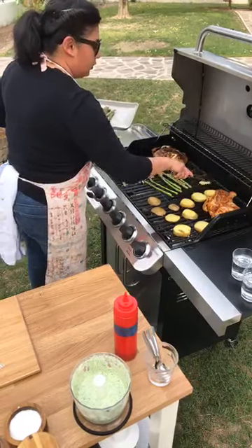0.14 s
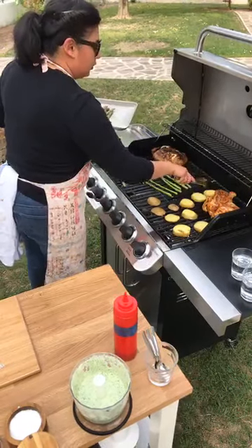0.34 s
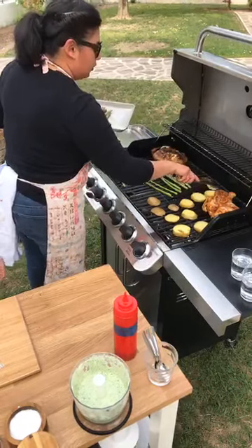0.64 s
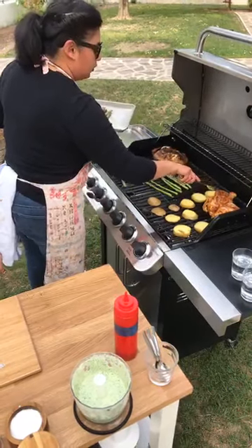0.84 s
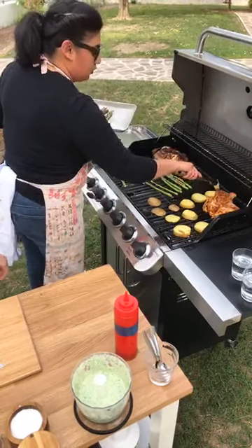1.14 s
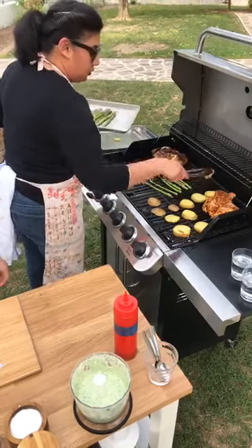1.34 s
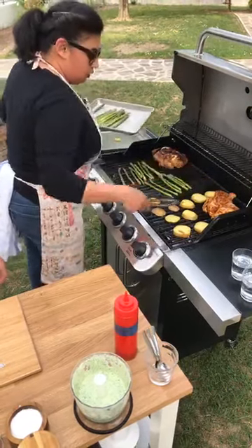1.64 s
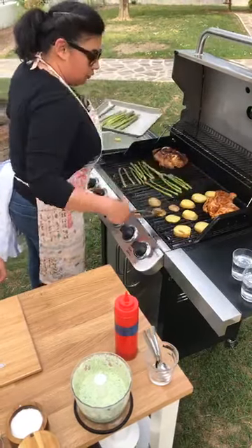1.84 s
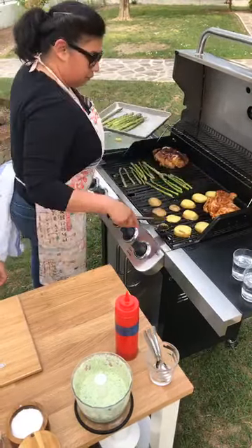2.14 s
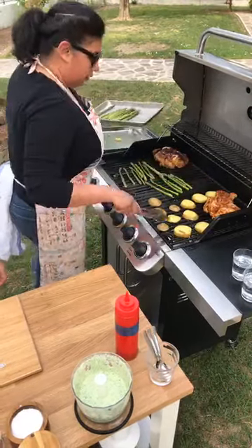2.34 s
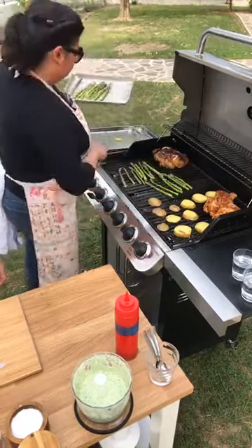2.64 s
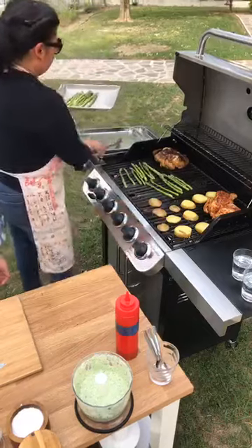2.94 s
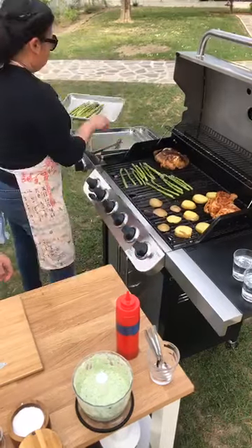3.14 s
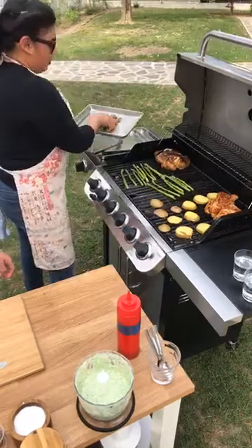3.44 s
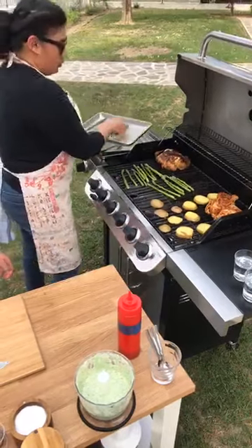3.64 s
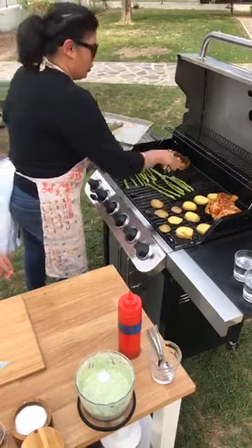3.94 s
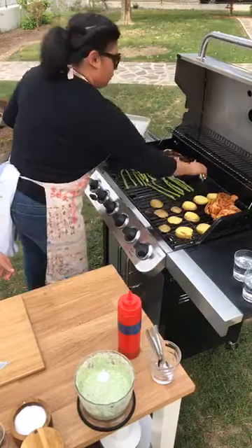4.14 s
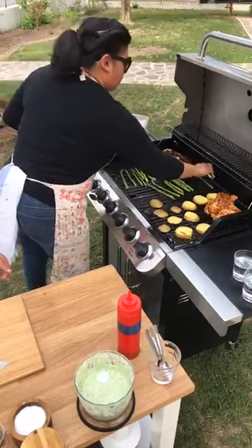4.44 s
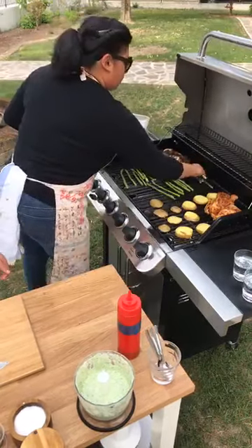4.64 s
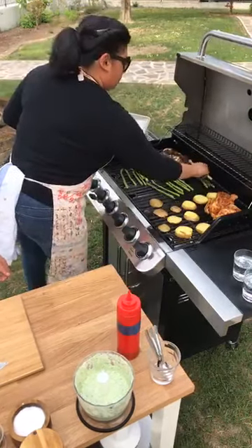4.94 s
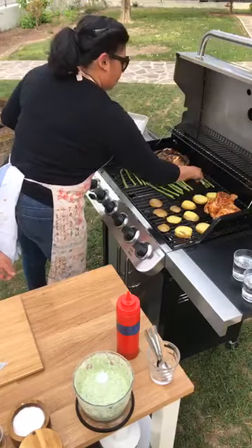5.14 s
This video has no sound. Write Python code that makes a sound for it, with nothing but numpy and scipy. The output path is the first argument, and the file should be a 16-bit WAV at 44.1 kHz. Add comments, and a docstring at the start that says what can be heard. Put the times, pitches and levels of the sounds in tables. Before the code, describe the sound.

Vegetables sizzle softly on a gas grill outdoors, a fine hiss and crackle with small spits of fat. Wind thumps and flutters on the microphone, strongest in the first half, then dies away. Metal tongs tap the grate, strike it once harder, then drop onto a steel tray with a ringing, bouncing clatter. Lighter taps follow over the faint rush of the burner, with a few barely audible distant whistles near the end.

```python
"""Vegetables sizzle on a gas grill outdoors, at one microphone: steam hisses, bubbles burst, fat spits.
Tongs knock the grate, then drop on a steel tray and bounce; the steel rings in many close modes.
Gusts thump and flutter on the microphone and die away. Behind the grill lie the burner and the
open air, and far off a faint whistle, perhaps a bird."""
import sys
import numpy as np
from scipy import signal
from scipy.fft import rfft, irfft
from scipy.io import wavfile
from scipy.ndimage import uniform_filter1d

SR = 44100
rng = np.random.default_rng(int(sys.argv[2]) if len(sys.argv) > 2 else 0)


def int16_out(signal):
    """Quantize to a 16-bit WAV file."""
    q = np.round(np.clip(np.atleast_2d(signal).T, -1, 1) * 32767)
    wavfile.write(sys.argv[1], SR, q.astype(np.int16))


N = 233994

# level of the sizzle as heard, ducking briefly after the tray clatter: t/s, level/dB
SIZZLE_LEVELS = [(0, -55), (.4, -54.5), (.7, -56.5), (1.2, -57), (1.38, -53.5), (2.05, -60), (2.8, -57),
                 (3.25, -60), (3.45, -56), (4.25, -63), (4.6, -60), (5.31, -60)]
# spectrum of the steam: f/Hz, level/dB
STEAM_SPECTRUM = [(880, -12), (1500, -9), (2400, -8), (3000, -8.5), (3750, -5), (4150, -12), (5100, -11.5),
                  (5400, -4), (6400, -2.5), (8500, -5), (10200, -8), (12000, -7), (13500, -11), (15500, -4)]
# drops of fat bursting: t/s, rough peak level/dB
FAT_SPITS = [(0.45, -39), (0.835, -44), (1.078, -39.5), (1.1603, -40.5), (1.282, -40.5), (1.4103, -37),
             (1.444, -44), (1.7883, -37), (2.2029, -43), (2.3573, -41), (2.458, -38.5), (3.4391, -42.5),
             (3.688, -39.5), (3.806, -34.5), (4.0978, -43.5), (4.4325, -39), (4.592, -37), (4.732, -36),
             (4.7517, -38.5), (4.9076, -46.5), (4.9696, -35.5)]
# tongs on the grate: t/s, level/dB, favoured f/Hz, fall-off/(dB per octave), ring time factor
GRATE_KNOCKS = [(.209, -46.5, 600, 7.5, 1.5), (.763, -50, 840, 8, 1.3), (.765, -53, 6340, 31, 0.37),
                (.895, -50.5, 2950, 5.5, 1.64), (.9, -54.5, 547, 13, 1.18), (.93, -53, 3000, 7, 0.84),
                (.962, -61, 1800, 4, 0.83), (.958, -51.5, 6350, 41, .6), (1.991, -50, 4000, 1.5, 0.73),
                (2.228, -31.5, 1770, 3, 1.67), (3.34, -47, 1450, 0, 0.81), (3.474, -54.5, 1320, 2.5, 0.37),
                (3.5, -59, 600, 16, 0.44), (3.898, -60, 2000, 25, 0.1), (4.398, -59, 220, 7, 1.2),
                (4.8, -63, 208, 12.5, 1.6), (5.268, -47.5, 520, 6, 0.95)]
# clear modes of the grate: f/Hz, level/dB, t60/s
GRATE_MODES = [(210, -7, .5), (340, -9, .4), (517, -7, .6), (635, -8, .4), (870, -3, .18), (990, -4, .45),
               (1195, -11, .25), (1443, -11, .3), (1696, -7, .25), (1880, -3, .4), (2606, -10, .22),
               (3250, -10, .22)]
# bands of close modes in the grate: f/Hz, level/dB, t60/s
GRATE_BANDS = [(182, 3, 0.31), (550, 2.5, 0.57), (860, 3.8, 0.5), (2000, 5, 0.31), (3430, 0.5, 0.2),
               (4930, -4.5, 0.29), (5640, 4, 0.27), (12100, -1, 0.24), (16000, -1, .2)]
# the tongs land on the tray, then bounce: t/s
TRAY_HITS = [2.863, 2.924, 2.988, 3.011, 3.109]
# clear modes of the tray: f/Hz, level/dB, t60/s
TRAY_MODES = [(530, -4, 0.22), (623, -5.5, 0.36), (768, -10, 0.16), (972, -5, 0.48), (1025, 2, 0.11),
              (1206, -16, 0.52), (1500, -8, 0.22), (1610, -7.5, 0.36), (1671, -8, 0.35),
              (3300, -11.5, 0.33), (6340, -5.5, 0.21), (7400, -4, 0.2)]
# bands of close modes in the tray: f/Hz, level/dB, t60/s
TRAY_BANDS = [(156, -5, 0.48), (324, -10, 0.84), (600, -8, 0.65), (1010, -0.5, 0.4), (2000, 1, 0.39),
              (4000, -3.5, 0.41), (6600, 3.5, 0.31), (9050, -8, 0.36), (12500, -4.5, 0.32), (16000, -9, .2)]
# wind on the microphone: t/s, thump level/dB, flutter level/dB
WIND_LEVELS = [(0, -58, -35.5), (.2, -37, -31.5), (.5, -45.5, -34), (.7, -42, -30.5), (1.5, -42, -35),
               (2.2, -42.5, -50.5), (3.4, -48, -54), (3.9, -53.5, -59), (4.5, -63, -57), (5.31, -47.5, -61)]
# single buffets: middle t/s, level/dB, half length/s, relative roar level/dB
WIND_BUFFETS = [(0.016, -34, 0.036, -28), (0.197, -43, 0.08, -3), (0.65, -35, 0.072, -21),
                (0.75, -37, .03, -14), (1.067, -30, 0.011, -11), (1.159, -37, 0.048, -0.5),
                (1.219, -33.5, 0.014, -24), (1.674, -32.5, 0.07, -27), (1.843, -38, 0.018, -38),
                (1.942, -31.5, 0.027, -54), (2.13, -33.5, 0.042, -12), (2.243, -37.5, 0.04, -19),
                (2.439, -26.5, 0.031, -14.5), (2.65, -36.5, 0.037, -12), (2.733, -32, 0.011, -42),
                (2.81, -33, 0.012, -35), (2.967, -35, 0.033, -14.5), (3.145, -24, 0.032, -33),
                (3.271, -31, 0.028, -37), (3.372, -33, 0.017, -15), (3.643, -37.5, 0.061, -56)]
# spectra of the wind's roar and thumps: f/Hz, level/dB
ROAR_SPECTRUM = [(70, -3.5), (110, 3), (200, -11), (260, -29.5), (500, -101)]
THUMP_SPECTRUM = [(10, -4), (25, 4.5), (40, 5.5), (55, 8.5), (90, -62)]
# a grate bar humming: t/s, length/s, level/dB
BAR_HUMS = [(3.45, 0.29, -69), (4.39, 0.78, -67)]
# burner and open air: f/Hz, level/dB
AMBIENCE_SPECTRUM = [(50, -29), (90, 0.5), (150, -9), (220, -12.5), (400, -19), (700, -22), (1300, -23),
                     (5000, -36.5), (8000, -93)]
# far whistles: t/s, length/s, first f/Hz, last f/Hz, glide time/s, level/dB
FAR_WHISTLES = [(4.25, .15, 2540, 2090, .15, -73), (4.65, .32, 1940, 2080, .11, -70),
                (5.09, .08, 2320, 2150, .08, -65)]


def sizzle(flicker_db=1.64, crackle_db=-10, bubbles_per_s=400):
    """On the grill, steam hisses with a flickering level and small bubbles burst in a crackle."""
    hiss = amp(flicker_db * wander(500, passes=2)) * rng.standard_normal(N)
    bubbles = amp(6 * np.minimum(rng.exponential(1, N), 5)) * (rng.random(N) < bubbles_per_s / SR)
    pop = decay(np.arange(800) / SR, t60=0.0029)
    crackle = signal.oaconvolve(bubbles, pop)[:N] * rng.standard_normal(N)
    steam = colour(unit_rms(hiss) + amp(crackle_db) * unit_rms(crackle), STEAM_SPECTRUM)
    return amp(curves(SIZZLE_LEVELS)[0]) * unit_rms(steam)


def spits(crest_db=9):
    """Each drop of fat bursts as a short puff, coloured like the steam but a shade duller."""
    out, t = np.zeros(N), np.arange(4096) / SR
    envelope = (1 - np.exp(-t / 0.00029)) * decay(t, t60=.05)
    for s, db in FAT_SPITS:
        puff = colour(rng.standard_normal(len(t)), STEAM_SPECTRUM)
        puff = colour(puff, [(750, .9), (48000, -.9)])
        add(out, s, amp(db - crest_db) * envelope * unit_rms(puff))
    return out


def tongs_on_grate():
    """The tongs knock and scrape the grate, which ticks and rings."""
    return struck_steel(GRATE_KNOCKS, GRATE_MODES, GRATE_BANDS,
                        modes_db=12, ripple_db=3, rattle_db=1.5, tick_db=2.5)


def tongs_on_tray(land_db=-23.5, loss_db_per_s=93):
    """Dropped tongs hit the tray; the bounces weaken, duller and shorter than the landing."""
    land, *bounces = TRAY_HITS
    blows = [(land, land_db, 4000, 2.5, 1.43)]  # columns as in GRATE_KNOCKS
    blows += [(s, land_db - loss_db_per_s * (s - land), 2490, 2.5, 0.69) for s in bounces]
    return struck_steel(blows, TRAY_MODES, TRAY_BANDS,
                        modes_db=9, ripple_db=1, rattle_db=1, tick_db=-32)


def struck_steel(blows, modes, bands, modes_db, ripple_db, rattle_db, tick_db):
    """Steel rings in bands of close modes and a few clear ones; each blow favours one region."""
    out, t = np.zeros(N), np.arange(SR) / SR
    centres = np.log([row[0] for row in bands])
    log_hz = np.log(np.fft.rfftfreq(SR, 1 / SR) + 1)
    ripple = amp(ripple_db * wander(30, length=len(log_hz)))
    mode_rise = 1 - np.exp(-t / 0.0054)
    for s, db, favoured_hz, slope_db, ring in blows:
        tick = amp(tick_db + 1.11 * (db + 48)) * decay(t, t60=0.034)  # harder blows tick more sharply
        emphasis = amp(-slope_db * abs(log_hz - np.log(favoured_hz)) / np.log(2))
        close_modes = rfft(rng.standard_normal(SR)) * ripple
        draws = rng.random((len(modes), 2))
        rattle = amp(rattle_db * wander(150, length=SR))  # loose parts chatter
        sound = np.zeros(SR)
        for k, (hz, band_db, t60) in enumerate(bands):
            weight = np.interp(log_hz, centres, np.arange(len(bands)) == k, left=0)
            spectrum = close_modes * weight
            band = irfft(spectrum * emphasis, SR) * SR / np.linalg.norm(spectrum)
            rise = 1 - np.exp(-t * hz / 7)  # bass swells slowly, treble at once
            sound += amp(band_db) * band * rise * (decay(t, t60 * ring) + tick) * rattle
        for (hz, mode_db, t60), (phase, spot) in zip(modes, draws):
            level_db = modes_db + mode_db - 3 * spot - slope_db * abs(np.log2(hz / favoured_hz))
            tone = np.sin(2 * np.pi * (hz * t + phase))
            sound += amp(level_db) * tone * mode_rise * (decay(t, t60 * ring) + tick)
        onset_rms = np.sqrt(np.mean(sound[:600] ** 2))
        add(out, s, amp(db) * sound / onset_rms)
    return out


def wind(roar_follows=0.7, lumps_db=3.8):
    """Right on the microphone: pressure thumps, flutter from eddies off the housing, a lumpy roar."""
    thump_db, flutter_db = curves(WIND_LEVELS)
    thump = steadied(colour(rng.standard_normal(N), THUMP_SPECTRUM), share=0.73)
    flutter = steadied(narrow_noise(N, hz=71, width_hz=20.5), share=0.55)
    roar = unit_rms(colour(rng.standard_normal(N), ROAR_SPECTRUM))
    roar_db = -52.5 + roar_follows * (flutter_db + 33) + lumps_db * wander(2500, passes=2)
    out = amp(thump_db) * thump + amp(flutter_db) * flutter + amp(roar_db) * roar
    t = np.arange(N) / SR
    for s, db, half_s, relative_db in WIND_BUFFETS:
        swell = amp(db) * np.exp(-((t - s) / half_s) ** 2)
        out += swell * (thump + amp(-13) * flutter + amp(relative_db) * roar)
    return out


def bar_hum():
    """A bar of the grate hums faintly while it is handled."""
    out = np.zeros(N)
    for s, length, db in BAR_HUMS:
        hum = steadied(narrow_noise(round(length * SR), hz=517, width_hz=24), share=.1)
        add(out, s, amp(db) * hum * signal.windows.tukey(len(hum), .35))
    return out


def burner_and_air(level_db=-58.5):
    """Behind the sizzle, the burner and the open air make a steady low rush."""
    return amp(level_db) * unit_rms(colour(rng.standard_normal(N), AMBIENCE_SPECTRUM))


def far_whistles():
    """Far off, thin and slightly fuzzy whistles, one glide each."""
    out = np.zeros(N)
    for s, length, first_hz, last_hz, glide_s, db in FAR_WHISTLES:
        t = np.arange(0, length, 1 / SR)
        hz = np.interp(t, [0, glide_s], [first_hz, last_hz])
        note = steadied(narrow_noise(len(t), hz, width_hz=80), share=.1)
        add(out, s, amp(db) * note * signal.windows.tukey(len(t), .3))
    return out


def amp(db):
    """Decibels to gain."""
    return 10 ** (np.asarray(db) / 20)


def decay(t, t60):
    """Falls 60 dB in t60 seconds."""
    return amp(-60 * t / t60)


def unit_rms(x):
    """Scales to rms 1."""
    return x / np.sqrt(np.mean(x ** 2) + 1e-20)


def wander(span, passes=1, length=N):
    """Random drift of rms 1, smoothed over span points."""
    x = rng.standard_normal(length)
    for _ in range(passes):
        x = uniform_filter1d(x, span)
    return unit_rms(x)


def curves(rows):
    """The columns after t/s, sample by sample."""
    s, *columns = np.transpose(rows)
    return [np.interp(np.arange(N) / SR, s, c) for c in columns]


def colour(x, points):
    """Filters by a spectrum of f/Hz, level/dB points."""
    f, db = np.transpose(points)
    hz = np.fft.rfftfreq(len(x), 1 / SR)
    return irfft(rfft(x) * amp(np.interp(np.log(hz + 1), np.log(f + 1), db)), len(x))


def add(mix, s, sound):
    """Mixes a sound in at s seconds."""
    part = mix[round(s * SR):][:len(sound)]
    part += sound[:len(part)]


def narrow_noise(length, hz, width_hz):
    """Noise through a resonance at hz, steady or gliding."""
    carrier = np.exp(2j * np.pi * np.cumsum(hz * np.ones(length)) / SR)
    pole = np.exp(-np.pi * width_hz / SR)
    baseband = signal.lfilter([1], [1, -2 * pole, pole * pole], rng.standard_normal(length) / carrier)
    return (carrier * baseband).real


def steadied(x, share):
    """Irons out a share of the level swings of a narrow noise."""
    x = unit_rms(x)
    return unit_rms(x / (abs(signal.hilbert(x)) + 0.19) ** share)


def scene():
    """Grill, tongs, wind and background at one microphone."""
    tongs = tongs_on_grate() + tongs_on_tray()
    return (tongs + wind() + sizzle() + burner_and_air() + spits() + bar_hum() + far_whistles())[None]


def record(dry, edge_hz=15800):
    """The microphone chain cuts the highest treble steeply."""
    lowpass = signal.firwin(511, edge_hz, window=("kaiser", 9), fs=SR)
    return signal.oaconvolve(dry, lowpass[None], "same")


dry = scene()
out = record(dry)
int16_out(out)
```